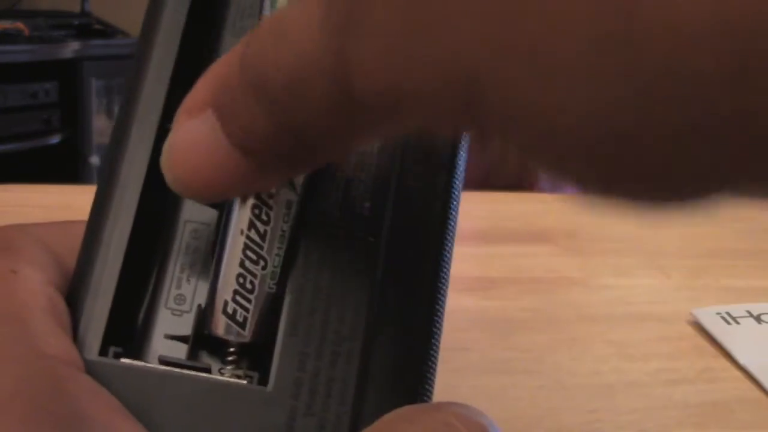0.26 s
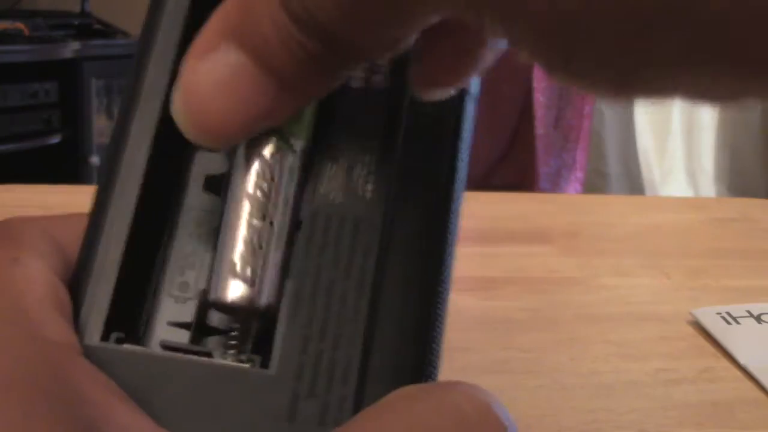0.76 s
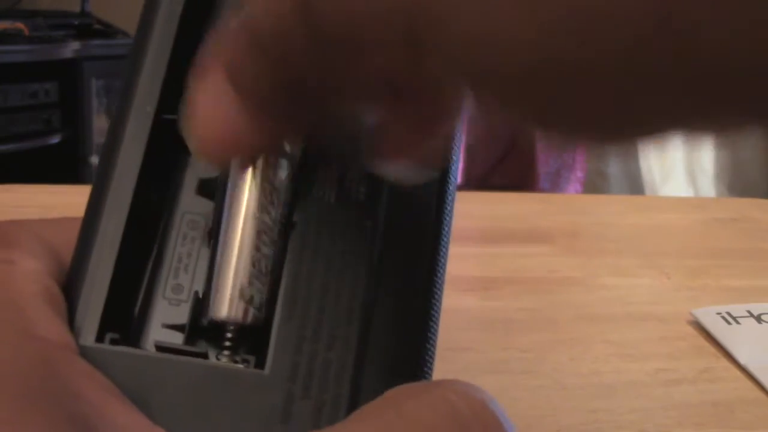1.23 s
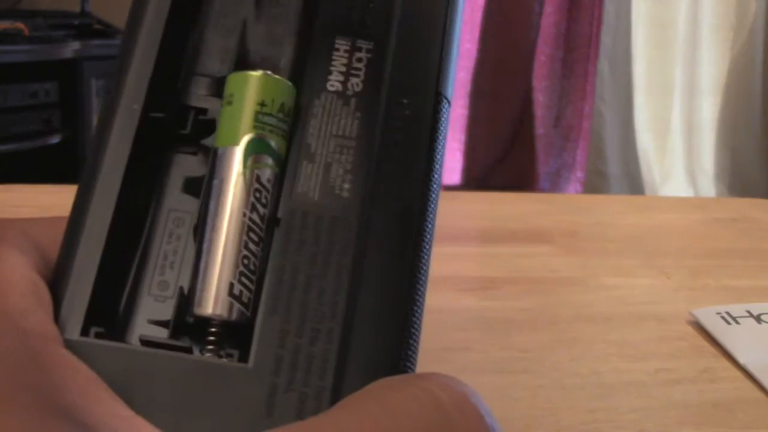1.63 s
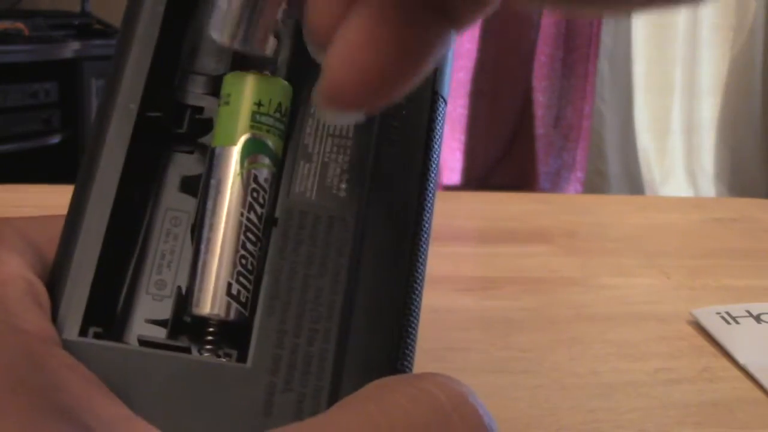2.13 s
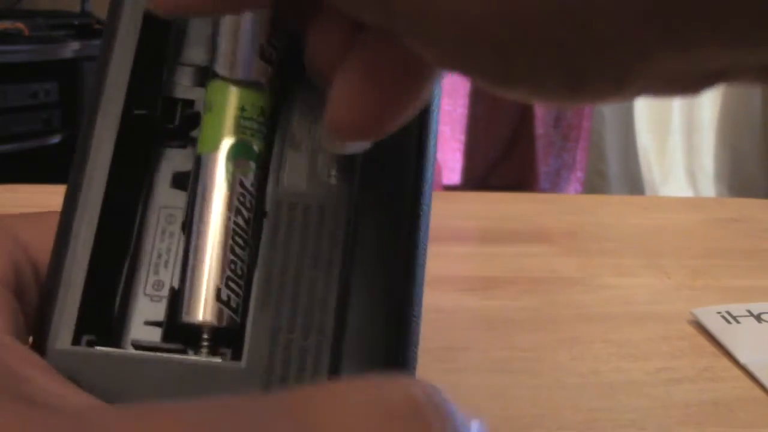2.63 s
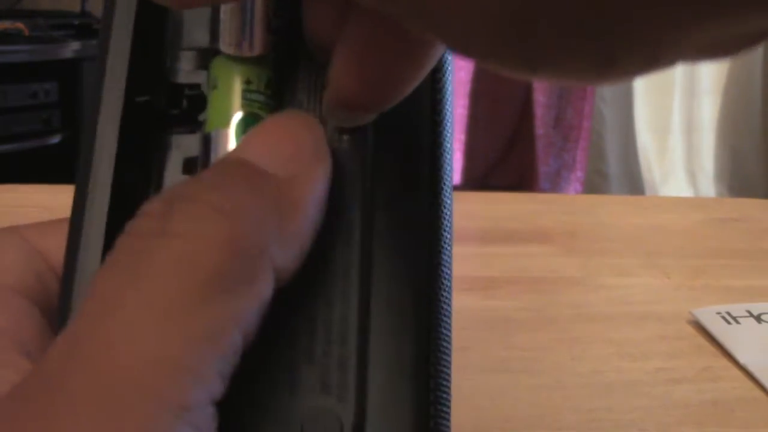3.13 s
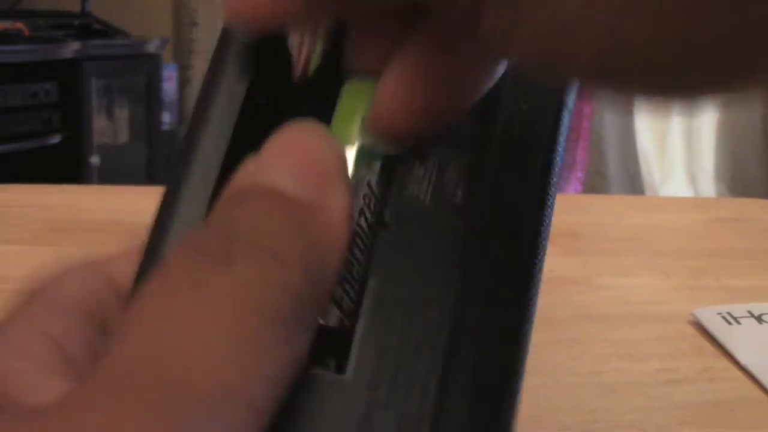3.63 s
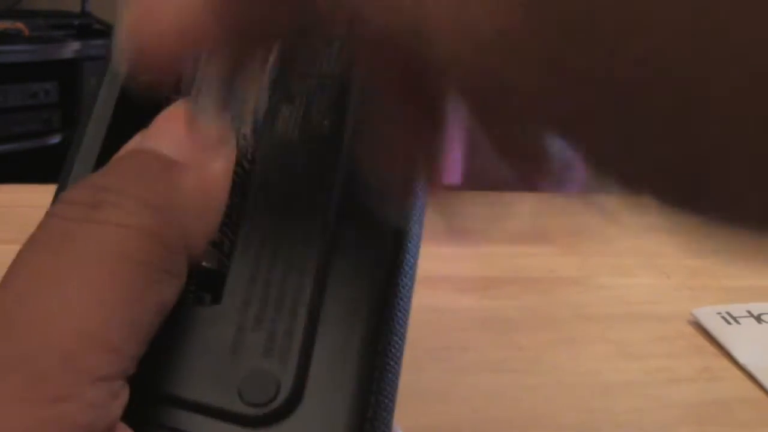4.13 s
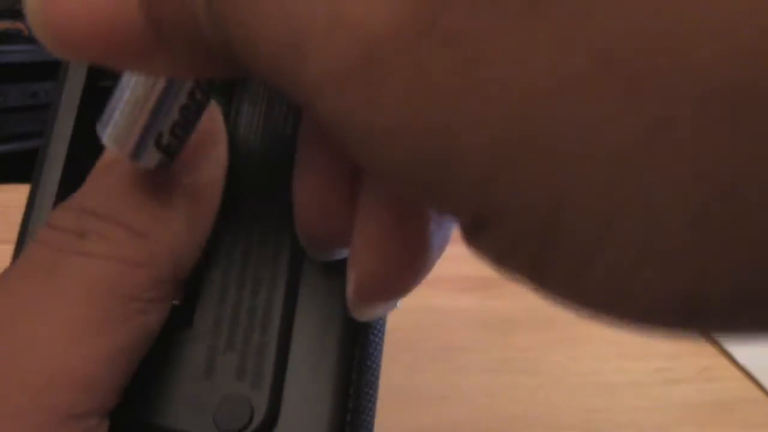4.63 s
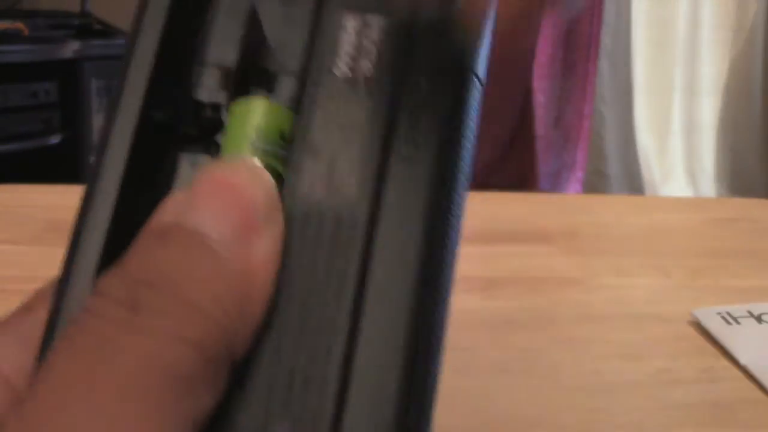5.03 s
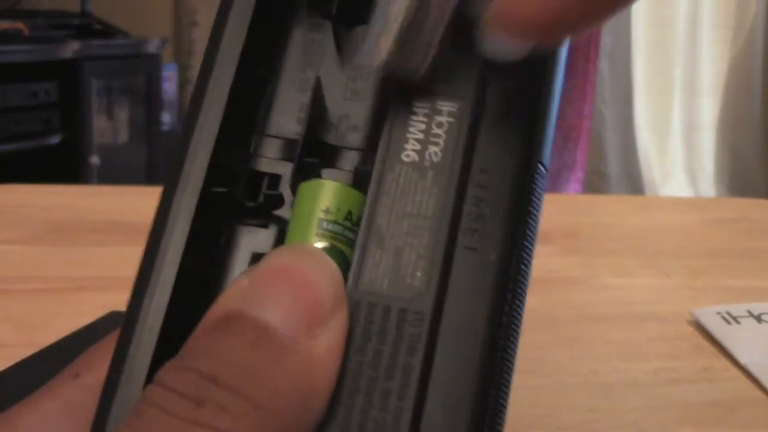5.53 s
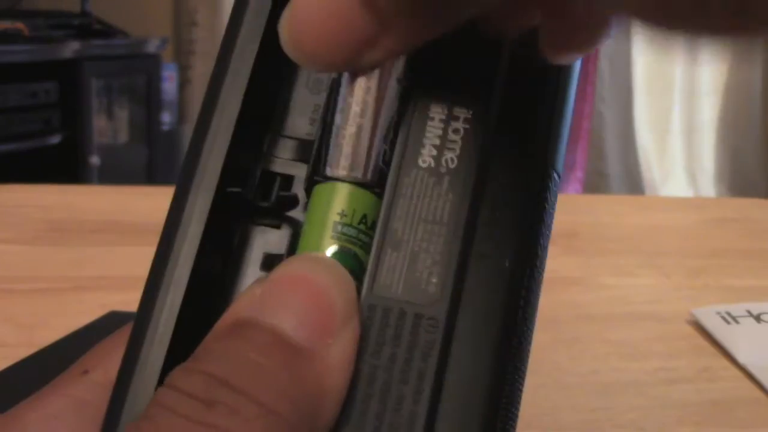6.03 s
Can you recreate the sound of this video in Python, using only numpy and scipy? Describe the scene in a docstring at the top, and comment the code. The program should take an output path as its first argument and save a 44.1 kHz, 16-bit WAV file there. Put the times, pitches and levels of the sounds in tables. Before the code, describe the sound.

Close, dry handling of a small plastic case in a quiet room, over steady low air, soft hiss and a faint hum. From 0 to 1.5 s a metal cell slides and knocks against the plastic, with scrapes, irregular bright clicks densest around 0.5-0.9 s and 1.0-1.3 s, and thin twangs from a contact spring. From 1.5 to 2.9 s it thins to faint rubs and small ticks, one clearer near 2.3 s. A light click at 2.96 s precedes a strong sharp knock at 3.49 s and a rapid clatter until 3.7 s. Sparse taps follow, one at 4.3 s, then near stillness. At 5.38 s a cell snaps home, abrupt, hard and by far the loudest. Soft rubs and small taps follow to 6.1 s, then a click at 6.12 s, a tiny gritty creak at 6.15-6.22 s and a last click at 6.27 s.

```python
"""A quiet room, close on a hand-held plastic case, two microphone ports side by side; steady air and a low hum.
A cell knocks and slides on the plastic while the contact spring twangs, then come sparse light touches.
From 2.85 s a thumb holds the cell down; a run of firm knocks follows near 3.5 s.
At 5.38 s a cell snaps home, loud enough to drive the limiter; near 6.15 s the next creaks in, amid last knocks.
Blows, twangs and creak are sums of dying modes; rubs, air and room tail are coloured noise."""
import sys
import numpy as np
from scipy import signal
from scipy.fft import rfft, irfft
from scipy.io import wavfile
from scipy.ndimage import uniform_filter1d, minimum_filter1d

SR = 44100
rng = np.random.default_rng(int(sys.argv[2]) if len(sys.argv) > 2 else 0)


def bounce(signal):
    """Save signal as a 16-bit WAV file at the path given by the first command-line argument."""
    frames = np.transpose(np.atleast_2d(signal))
    limited = np.clip(frames, -1, 1)
    pcm = np.round(limited * 32767).astype(np.int16)
    wavfile.write(sys.argv[1], SR, pcm)


N = 276507  # samples

# Still room air. Each row: frequency in Hz, relative density in dB per Hz.
AIR_COLOUR = [(15, -27), (25, -0.5), (48, -8), (87, -7.5), (195, -9.5), (249, -8), (301, -13), (344, -12),
              (384, -17), (695, -16.5), (775, -20), (1040, -23.5), (1260, -23.5), (5000, -32.5),
              (16000, -43)]
# Likeness of the air at the two ports. Each row: frequency in Hz, correlation from -1 to 1.
PORT_LIKENESS = [(30, 0.93), (80, 0.91), (150, 0.66), (280, 0.57), (600, 0.42), (1500, 0.66), (12000, 0.77)]
AIR_DB, HUM_DB, HUM_HZ = -48.5, -58.5, 80.9
# Room tail. Each row: frequency in Hz, t60 in s.
ROOM_DECAY = [(200, 0.87), (900, 0.59), (2500, 0.59), (6000, 0.62), (15000, 0.53)]
# Colour of the sound that feeds the tail. Each row: frequency in Hz, gain in dB.
TAIL_COLOUR = [(150, -41), (500, 4), (1000, 2), (2200, -2), (4000, -2), (6000, 4.5), (8000, -6),
               (12000, -4), (16000, -4)]
DIFFUSE_SHARE = 0.9  # share of the tail's feed, in power, that is diffused into noise

# Body, knock and edge ranges. Each row: lower limit in Hz, upper limit in Hz.
RANGES = [(400, 1500), (1500, 4500), (4500, 16000)]
RANGE_FILTERS = [signal.butter(3, limits, "bandpass", fs=SR, output="sos") for limits in RANGES]
BLOW_S = 0.004  # reference length of a blow, for its energy
WALL_HZ = 1000  # grip pitch at which the low case modes ring as tabled

# The case is jolted in the hand. Each row: start in seconds, level in dB, frequency in Hz, t60 in s.
JOLTS = [(2.664, -35.5, 217, 0.058), (2.674, -35.5, 305, 0.091), (5.3763, -22, 270, 0.012),
         (5.3772, -7, 526, 0.014), (5.525, -29.5, 312.5, 0.022), (5.574, -34, 290, 0.081)]
# Cells and fingers slide on the case.
# Each row: middle in seconds, length in s, knock-range level in dB, hardness of the contact in dB.
STROKES = [(0.081, 0.47, -49, -1), (0.339, 0.2, -46, 2.5), (.53, 0.085, -42, 1), (0.598, 0.086, -37, -2),
           (0.851, 0.073, -37, -2), (1.051, 0.081, -37.5, -0.5), (1.263, 0.38, -41, -2),
           (1.505, .13, -44, -2), (1.741, 0.16, -57.5, 6.5), (2.256, 0.081, -50.5, 5.5),
           (2.75, 0.42, -51, 0), (2.942, 0.11, -40, 2.5), (3.031, 0.18, -53.5, 1.5), (3.228, .09, -55, -1),
           (3.455, 0.17, -37.5, -3), (3.501, 0.12, -31, 2.5), (3.595, 0.079, -27.5, -2),
           (3.76, 0.24, -43, -4), (3.994, .1, -52, 3), (4.198, 0.26, -56.5, -1.5), (4.476, 0.12, -47.5, 0),
           (4.798, 0.36, -55.5, -2.5), (4.884, .07, -54.5, -13), (5.558, .07, -49, -9),
           (5.665, 0.067, -48.5, -8), (5.759, .1, -48, 0.5), (5.844, .11, -43, 0.5), (5.934, .13, -38, -1),
           (6.002, 0.08, -42, -5.5), (6.174, 0.25, -39, -6.5)]
# Sliding, chatter and diffused room sound. Each row: frequency in Hz, relative density in dB per Hz.
RUB_COLOUR = [(400, -25.5), (520, 2.5), (690, -3.5), (900, 3), (1300, 1.5), (1750, 3), (2250, 12),
              (3000, 13), (3900, -2.5), (4800, -13), (7000, -13.5), (9200, -16.5), (12000, -21),
              (16000, -27)]
# A loose sliding contact, middling hardness. Columns: body, then edge, in dB against the knock range.
LOOSE_SLIDE_DB = (-2.5, -7)
# The same with the cell held down, in the same columns: the hollow body is damped.
HELD_SLIDE_DB = (-9.5, -3)
HELD_FROM_S = 2.85  # from here a thumb holds the cell down

# The contact spring slips and rings. Each row: start in seconds, level in dB before trim, ring time factor.
TWANGS = [(.351, -33, 0.73), (.4437, -37, 1.04), (.578, -28.5, 1.03), (.666, -33, 0.29),
          (.8351, -24.5, 0.94), (.999, -43.5, 0.84), (1.2487, -28, 0.47), (1.258, -26, 0.41),
          (1.28, -34, 1.7), (1.4854, -24, 0.23), (1.495, -29, .54), (2.246, -40, .45)]
# Modes of the spring. Each row: frequency in Hz, relative level in dB, t60 in s, before pitch and ring factors.
SPRING_MODES = [(2024, 4, 0.11), (2220, -7.5, 0.029), (2520, -25, .08), (2770, -8, 0.074),
                (3226, 4.5, 0.035), (4690, -8.5, 0.13), (5620, -9, 0.084), (6550, -3.5, 0.073),
                (7800, -2, 0.037), (8500, -5, 0.085)]
# The spring rings higher until the thumb lets it go.
PINNED_UNTIL_S, PINNED_HZ = 0.5, 2170

# The tight cell sticks and slips. Each row: time in seconds, slips a second, level in dB before trim.
CREAK_COURSE = [(6.152, 157, -29), (6.165, 158, -24.5), (6.173, 300, -24.5), (6.188, 273, -23),
                (6.202, 320, -23), (6.216, 280, -30.5)]
# Modes of the wall beside the tight cell. Each row: frequency in Hz, relative level in dB, t60 in s.
TIGHT_WALL_MODES = [(900, -6, 0.18), (1360, 6, 0.035), (2030, 1, 0.027), (2220, 11.5, 0.012),
                    (2780, 8.5, 0.006), (3120, 11, 0.0081), (4030, -8, .01), (5370, -13, 0.0062),
                    (6660, 5.5, 0.0063), (7650, -26, .005), (8950, -15, 0.011), (10500, -37, .004)]
# Crack at the point of contact. Each row: frequency in Hz, relative density in dB per Hz.
CRACK_COLOUR = [(300, -16.5), (900, -4), (3000, 11.5), (5000, -1), (7000, 1.5), (10000, -3.5), (12500, -11),
                (16000, -22)]

# A cell hits the case. Each row: time in seconds, knock-range level in dB, hardness of the contact in dB,
# ring time factor, frequency in Hz that the struck spot favours.
KNOCKS = [(.102, -42.5, -10.5, 0.79, 2180), (.3503, -34.5, 5.5, 1.8, 3120), (0.376, -33.5, -3, 1.8, 2220),
          (0.3878, -31.5, 1, .8, 3900), (0.5285, -39, -10.5, 1.4, 1930), (0.545, -28, 9, 0.55, 2770),
          (0.5904, -22.5, 11.5, 0.32, 3750), (0.6063, -19, 13.5, 0.61, 2220),
          (0.7044, -33.5, -4.5, .8, 2500), (0.7497, -22.5, -6, 1.5, 2330), (0.78, -27, -5.5, 1.5, 2350),
          (0.813, -17, -1, 0.78, 2350), (0.8213, -30, -4, .7, 2400), (0.8387, -22, 2.5, 1.8, 3030),
          (.853, -31, 3, .7, 1940), (0.8662, -31, 1, 0.51, 2350), (1.022, -34.5, -4, 0.53, 2220),
          (1.049, -19.5, 3, 0.6, 2430), (1.061, -25, 2.5, 1.1, 2350), (1.191, -33.5, -4, 0.65, 2070),
          (1.2347, -22, 0.5, 0.58, 3140), (1.2662, -29, 2, .5, 2800), (1.2793, -26, 1.5, 1.4, 3230),
          (1.306, -30.5, 5.5, 0.67, 2630), (1.5076, -28.5, 0.5, 0.73, 2340), (2.23, -46.5, -11, 0.73, 1920),
          (2.2939, -29.5, -1.5, 1.8, 2830), (2.3027, -34.5, 1, 2.2, 2900), (2.379, -43.5, 0, 1.9, 2200),
          (2.4443, -46.5, -4.5, 0.52, 3080), (2.5104, -35.5, 3, 2.1, 2180), (2.959, -30, 4, 3.6, 2240),
          (3.4889, -9, 6, 1.34, 2650), (3.499, -29, 5, 0.73, 3530), (3.5215, -22.5, 1, 1.6, 2350),
          (3.563, -21, 3.5, .6, 2610), (3.588, -18.5, 3.5, 1.2, 2840), (3.5978, -16, 1, 0.87, 3200),
          (3.6208, -27, 0, 1.9, 2050), (3.655, -29, 5, 0.54, 1980), (3.699, -29.5, 4.5, 0.82, 2700),
          (3.7824, -36.5, 7, 1.3, 2320), (3.972, -40, 1.5, 1.9, 2430), (4.291, -29, 2, 0.9, 2220),
          (4.621, -41.5, 3.5, 1.3, 2620), (4.906, -43, 6.5, 0.79, 2330), (5.2067, -37, 3, 0.25, 2520),
          (5.3772, 1.5, 8, 1.2, 2060), (5.3783, -2.5, -3.5, 0.98, 2050), (5.5391, -30, -8.5, 1.6, 2240),
          (5.7308, -36.5, -4, 0.8, 2030), (5.9585, -34, -7, 1.3, 3100), (5.9968, -38, -14, 1.4, 1810),
          (6.003, -34, -13, 1.6, 2270), (6.073, -42.5, -1, 0.57, 3850), (6.1244, -21.5, 0, 0.68, 3000),
          (6.2665, -25.5, 4.5, 1.6, 2500)]
# Modes of the case. Each row: frequency in Hz, relative level in dB, t60 in s, before grip and ring factors.
CASE_MODES = [(571, -24.5, 0.04), (872, -12, 0.038), (1020, 1.5, 0.011), (1245, -12, 0.01),
              (1574, -14, 0.022), (2064, -3.5, 0.019), (2350, 5.5, 0.013), (2650, 0, 0.016),
              (3018, 11.5, 0.0046), (3850, -6, 0.013), (4930, -24.5, 0.039), (5697, -12.5, 0.018),
              (6650, -15, 0.0068), (7310, -17.5, 0.017), (7360, -19, 0.03), (8470, -5.5, 0.007),
              (8700, -37, 0.0016), (11100, -4, 0.003), (13300, -20.5, 0.0037)]
# The grip stiffens the case. Each row: time in seconds, grip pitch in Hz (against WALL_HZ).
GRIP_PITCH = [(.5, 887), (.62, 1217), (1.3, 1212), (1.5, 943), (3.49, 1104), (3.58, 955), (4.3, 900),
              (5.9, 935), (6.15, 1024)]
# A blow of middling hardness. Columns: body, then edge, in dB against the knock range.
BLOW_COLOUR_DB = (-2, -13.5)

CEILING_DB = 3.2  # limiter threshold against full scale
EDGE_HZ = 16200  # band limit


def amp(db):
    """Decibels to gain."""
    return 10 ** (np.asarray(db) / 20)


def evened(x):
    """Scales to rms 1."""
    return x / np.sqrt(np.mean(x ** 2) + 1e-20)


def as_blow(x):
    """Scales to the energy of a blow of rms 1 lasting BLOW_S."""
    return x * np.sqrt(BLOW_S * SR / (np.sum(x ** 2) + 1e-20))


def read(points, hz):
    """Reads a table on a log-frequency axis."""
    f, value = np.transpose(points)
    return np.interp(np.log(hz + 1), np.log(f + 1), value)


def coloured(x, points):
    """Filters x by a table of gains over frequency."""
    length = np.shape(x)[-1]
    gain = amp(read(points, np.fft.rfftfreq(length, 1 / SR)))
    return irfft(rfft(x) * gain, length)


def split(x):
    """Body, knock and edge ranges of a sound."""
    return [signal.sosfilt(sos, x) for sos in RANGE_FILTERS]


def add(mix, s, sound):
    """Mixes a sound in at time s."""
    part = mix[max(round(s * SR), 0):][:len(sound)]
    part += sound[:len(part)]


def wander(hz, length):
    """Slow chance movement: straight lines between random knots, hz knots a second."""
    knots = rng.standard_normal(length // 40 + 2)
    return np.interp(np.arange(length) * hz / SR, np.arange(len(knots)), knots)


def air():
    """Steady rumble and hiss, partly alike at the two ports, with a wavering low hum."""
    left, other = rfft(rng.standard_normal((2, N)))
    same = np.clip(read(PORT_LIKENESS, np.fft.rfftfreq(N, 1 / SR)), -1, 1)
    right = same * left + np.sqrt(1 - same ** 2) * other
    noise = coloured(irfft([left, right], N), AIR_COLOUR)
    waver = evened(uniform_filter1d(rng.standard_normal(N), size=6000))
    hum_hz = HUM_HZ + 3 * waver
    hum = evened(np.sin(2 * np.pi * np.cumsum(hum_hz) / SR))
    return amp(AIR_DB) * evened(noise) + amp(HUM_DB) * hum


def diffused(x):
    """The walls gather sound from all sides of the case, which evens out its resonances: noise follows its level."""
    noise = coloured(rng.standard_normal(N), RUB_COLOUR)
    spread = np.zeros(N)
    for part, noise_part in zip(split(x), split(noise)):
        level = np.sqrt(abs(uniform_filter1d(part ** 2, size=100)))
        spread += level * evened(noise_part)
    return spread


def room(x, tail_db=-20, early_db=-19):
    """Echoes from the desk and hands, then a faint tail of noise that dies by band."""
    hz, t, z = signal.stft(rng.standard_normal((2, SR * 3 // 4)), SR, nperseg=256)
    decay = amp(-60 * t / read(ROOM_DECAY, hz)[:, None])
    tail = signal.istft(z * decay * (1 - np.exp(-t / 0.0017)), SR, nperseg=256)[1]
    tail = tail + 0.89 * tail[::-1]  # the two ports are close together
    feed = np.sqrt(1 - DIFFUSE_SHARE) * x + np.sqrt(DIFFUSE_SHARE) * diffused(x)
    feed = coloured(feed, TAIL_COLOUR)
    late = signal.fftconvolve(feed[None], tail / np.linalg.norm(tail[0]), axes=1)[:, :N]
    early = np.zeros(N)
    for delay in np.linspace(0.004, 0.024, 8) + rng.uniform(-0.00094, 0.00081, 8):
        add(early, delay, x * rng.choice([-1, 1]) * np.exp(-delay / 0.015))
    return amp(early_db) * early + amp(tail_db) * late


def bumps():
    """The whole case moves against the flesh of the hand: a low, soft knock, one dying sine each."""
    out, t = np.zeros(N), np.arange(SR // 6) / SR
    for s, db, hz, t60 in JOLTS:
        onset = 1 - np.exp(-t / 0.00038)
        add(out, s, amp(db - 60 * t / t60) * np.sin(2 * np.pi * hz * t) * onset)
    # a small case cannot radiate deep bass
    return signal.sosfilt(signal.butter(3, 170, "highpass", fs=SR, output="sos"), out)


def ringing(modes, t, pitch, ring, scatter_db, detune, favour_db=0):
    """Dying modes; each contact point weights them differently."""
    hz, db, t60 = np.transpose(modes)[:, :, None]
    weight, shift, side = rng.standard_normal((3, len(modes), 1))
    waves = np.sign(side) * np.sin(2 * np.pi * hz * pitch * (1 + detune * shift) * t)
    levels_db = db + favour_db + scatter_db * weight - 60 * t / (t60 * ring)
    return (waves * amp(levels_db)).sum(0)


def case_blow(wall_hz, spot_hz, ring):
    """A brief crack, the damped walls, and a faint chatter of the parts inside."""
    t = np.arange(SR // 12) / SR
    hz = np.array(CASE_MODES)[:, :1]
    grip = np.where(hz < RANGES[0][1], wall_hz / WALL_HZ, 1)  # the hand shifts only the low modes
    favour_db = 7 * np.exp(-(np.log(hz / spot_hz) / 0.055) ** 2)  # lifts modes near the spot's pitch
    crack_noise = evened(coloured(rng.standard_normal(len(t)), CRACK_COLOUR))
    crack = amp(10) * np.exp(-t / (0.0015 * ring)) * crack_noise
    chatter_noise = evened(coloured(rng.standard_normal(len(t)), RUB_COLOUR))
    chatter = amp(-16) * np.exp(-t / 0.0042) * chatter_noise
    walls = ringing(CASE_MODES, t, grip, ring, scatter_db=-1.3, detune=0.0091, favour_db=favour_db)
    onset = 1 - np.exp(-t / 0.0013)
    return (walls + crack + chatter) * onset


def contact(db, hardness_db, colour_db):
    """Gains of body, knock and edge: a harder contact trades hollow body for edge."""
    body_db, edge_db = colour_db
    return amp(db + np.array([body_db - hardness_db, 0, edge_db + hardness_db]))


def slide_gains(s, db, hardness_db):
    """Gains of body, knock and edge for a stroke at time s, loose or held by the thumb."""
    return contact(db, hardness_db, HELD_SLIDE_DB if s > HELD_FROM_S else LOOSE_SLIDE_DB)


def sliding(grains_per_s=900, grain_share=0.25, uneven_db=2, uneven_hz=110):
    """Tiny catches tap the case over a smooth rub; both swell and fade with each stroke and its uneven pressure."""
    t = np.arange(N) / SR
    sizes = amp(4 * np.minimum(rng.exponential(1, N), 3))
    catches = sizes * (rng.random(N) < grains_per_s / SR)
    spots_hz = np.geomspace(2100, 3900, num=8)
    spot = rng.integers(0, len(spots_hz), N)
    grains = np.zeros(N)
    for k, hz in enumerate(spots_hz):
        tap = case_blow(WALL_HZ, hz, ring=0.33)
        grains += signal.oaconvolve(catches * (spot == k), tap)[:N]
    rub = coloured(rng.standard_normal(N), RUB_COLOUR)
    out = np.zeros(N)
    for k, (grain, smooth) in enumerate(zip(split(grains), split(rub))):
        power = np.zeros(N)
        for middle, length, db, hardness_db in STROKES:
            start, end = middle - length / 2, middle + length / 2
            stroke_t = t[max(int(start * SR), 0):int(end * SR)]
            speed = np.sin(np.pi * np.interp(stroke_t, [start, end], [0, 1]))
            add(power, start, slide_gains(middle, db, hardness_db)[k] ** 2 * speed ** 3)
        texture = np.sqrt(grain_share) * evened(grain) + np.sqrt(1 - grain_share) * evened(smooth)
        out += np.sqrt(power) * texture
    return amp(uneven_db * wander(uneven_hz, N)) * out


def hit(s, db, hardness_db, ring, spot_hz):
    """One blow on the case, as it is gripped at time s."""
    wall_hz = np.interp(s, *np.transpose(GRIP_PITCH))
    parts = split(case_blow(wall_hz, spot_hz, ring))
    gains = contact(db, hardness_db, BLOW_COLOUR_DB)
    return sum(gain * as_blow(part) for gain, part in zip(gains, parts))


def rattles(count=3, loose_db=2, held_db=-3, spread_db=2, reach=0.28):
    """A sliding cell ticks on the slot at chance moments: louder in a stronger stroke, softer once held down."""
    out = np.zeros(N)
    for middle, length, db, hardness_db in STROKES:
        tick_db = db + (held_db if middle > HELD_FROM_S else loose_db)
        for place, size, spot in rng.uniform(-1, 1, (count, 3)):
            s = middle + reach * length * place
            spot_hz = 2600 * np.exp(0.21 * spot)
            add(out, s, hit(s, tick_db + spread_db * size, hardness_db, 0.77, spot_hz))
    return out


def spring(trim_db=-1, rasp_hz=500, overtone_db_per_octave=-4):
    """The coil rings on after the end of the cell slips over it, rasping against the cap."""
    out, t = np.zeros(N), np.arange(SR // 5) / SR
    free_hz = SPRING_MODES[0][0]
    overtones_db = overtone_db_per_octave * np.log2(np.array(SPRING_MODES)[:, :1] / free_hz)
    onset = 1 - np.exp(-t / 0.00084)
    for s, db, ring in TWANGS:
        pitch = PINNED_HZ / free_hz if s < PINNED_UNTIL_S else 1
        coil = ringing(SPRING_MODES, t, pitch, ring, scatter_db=1.5, detune=0.003, favour_db=overtones_db)
        # rough only while the cap still rubs
        rasp = 1 + 0.78 * np.exp(-t / 0.014) * wander(rasp_hz, len(t))
        add(out, s, amp(db) * coil * rasp * onset)
    return amp(trim_db) * out


def creak(jitter=0.07, size_db=-0.3, scatter_db=5.5, grit_db=-9, trim_db=1):
    """A quick run of slips; each kicks all the wall's modes at once, from a slightly new spot, with a little grit."""
    times, rates, levels_db = np.transpose(CREAK_COURSE)
    t = np.arange(SR // 20) / SR
    hz, db, t60 = np.transpose(TIGHT_WALL_MODES)[:, :, None]
    low_cut = signal.butter(2, 650, "highpass", fs=SR, output="sos")
    out, s = np.zeros(N), times[0]
    for draws in rng.standard_normal((24, len(t) + 2)):  # at most 24 slips
        size, gap, noise = draws[0], draws[1], draws[2:]
        weight, shift = rng.standard_normal((2, len(hz), 1))
        if s < times[-1]:
            waves = np.sin(2 * np.pi * hz * (1 + 0.03 * shift) * t)
            wall = (amp(db + scatter_db * weight - 60 * t / t60) * waves).sum(0)
            grit = amp(grit_db) * coloured(noise, CRACK_COLOUR) * np.exp(-t / 0.0006)
            slip = as_blow(signal.sosfilt(low_cut, wall) + grit)
            add(out, s, amp(np.interp(s, times, levels_db) + size_db * size) * slip)
        s += np.exp(jitter * gap) / np.interp(s, times, rates)
    return amp(trim_db) * out


def clicks():
    """The cells knock on the case; harder contacts put more of the blow into the high modes."""
    out = np.zeros(N)
    for s, *blow in KNOCKS:
        add(out, s - 0.0002, hit(s, *blow))
    return out


def scene(half_lead_samples=0.025):
    """The handling is almost straight in front: it reaches the left port a hair before the right."""
    near = bumps() + sliding() + rattles() + spring() + creak() + clicks()
    # adding or taking a little of the slope moves a sound slightly earlier or later
    lead = half_lead_samples * np.array([[1], [-1]]) * np.gradient(near)
    return air() + room(near) + near + lead


def record(dry, recovery_db_per_s=110, offset=0.011):
    """A limiter ducks just ahead of the hardest blow and recovers; peaks clip; a small offset; the band limit."""
    # loudest level within 60 samples either side, so that the ducking starts early
    peak_db = -minimum_filter1d(-20 * np.log10(abs(dry).max(0) + 1e-9), size=120)
    fall = np.arange(N) * recovery_db_per_s / SR
    held_db = np.maximum.accumulate(peak_db + fall) - fall
    over_db = np.maximum(held_db - CEILING_DB, 0)
    gain_cut = amp(uniform_filter1d(over_db, size=120))
    limited = np.clip(dry / gain_cut + offset, -1, 1)
    band_limit = signal.firwin(255, EDGE_HZ, window=("kaiser", 8), fs=SR)
    return signal.oaconvolve(limited, band_limit[None], "same")


dry = scene()
out = record(dry)
bounce(out)
```